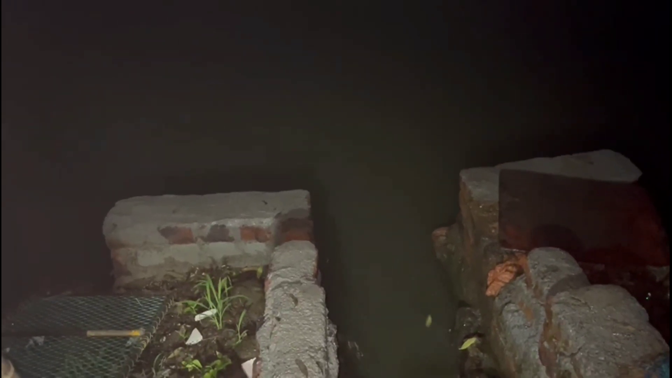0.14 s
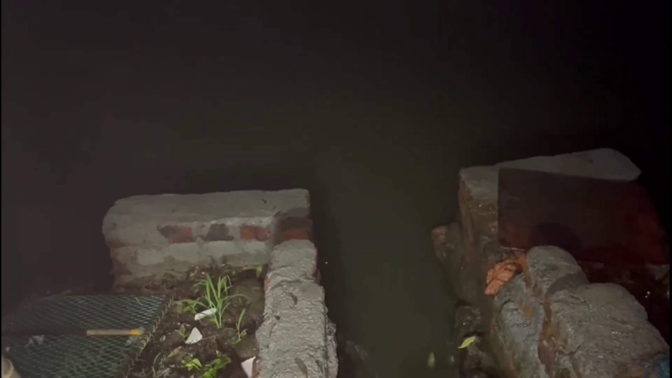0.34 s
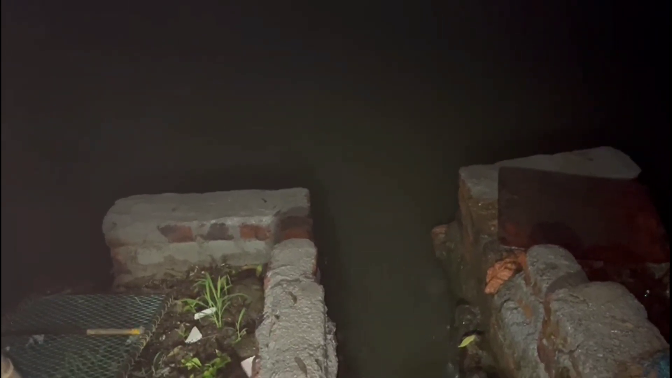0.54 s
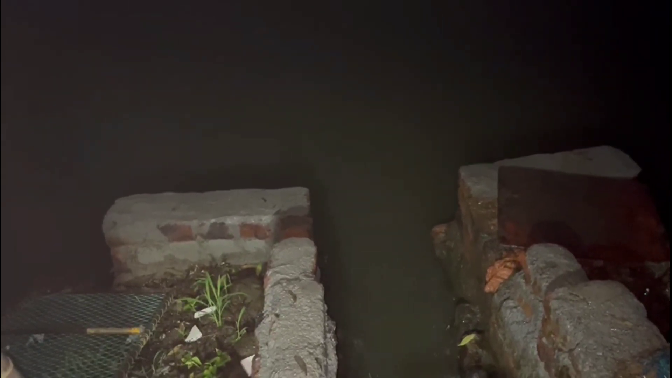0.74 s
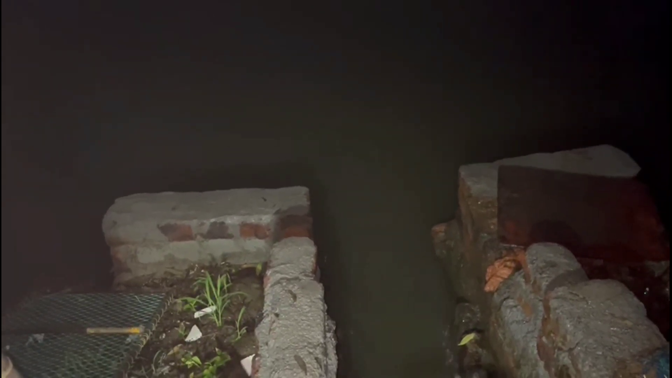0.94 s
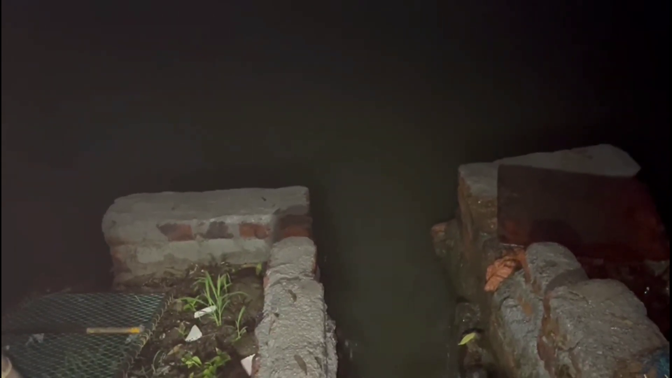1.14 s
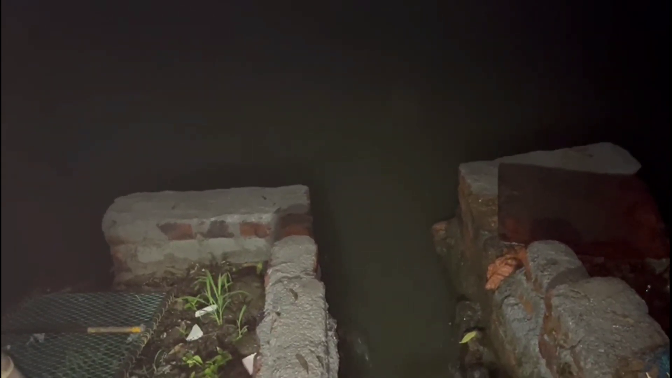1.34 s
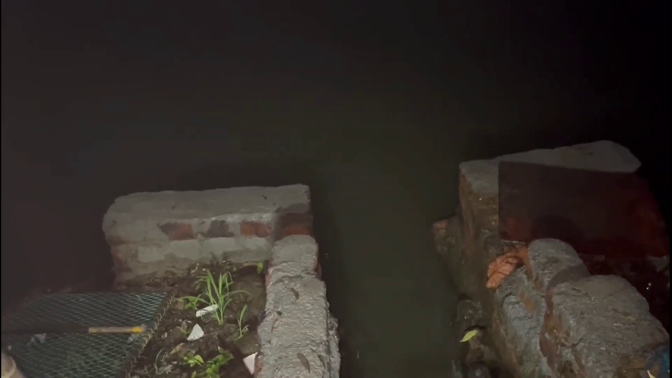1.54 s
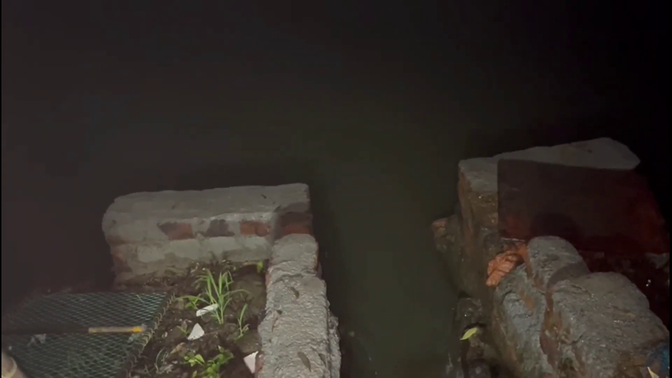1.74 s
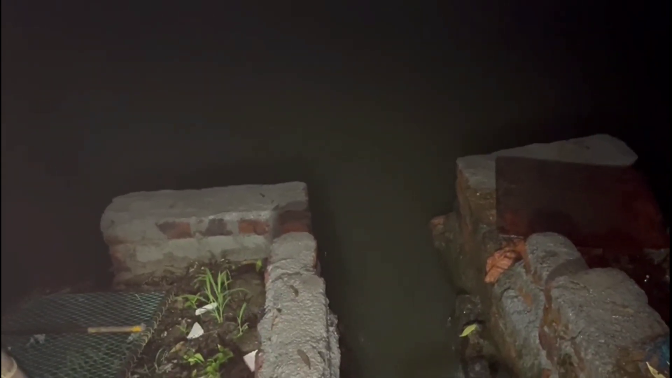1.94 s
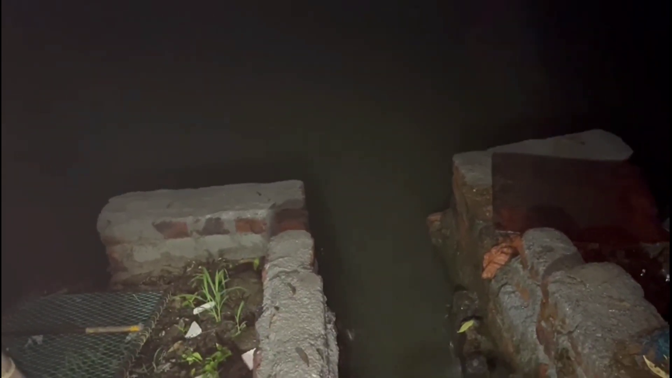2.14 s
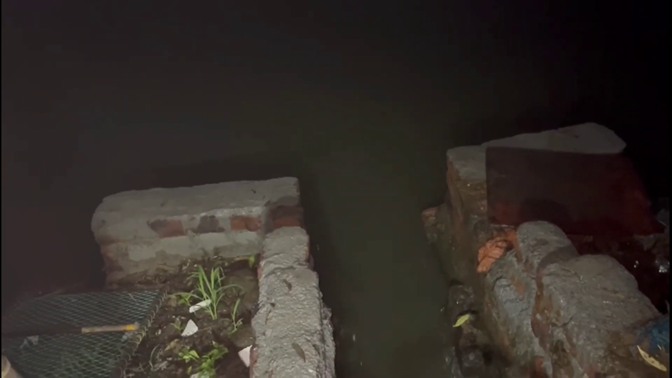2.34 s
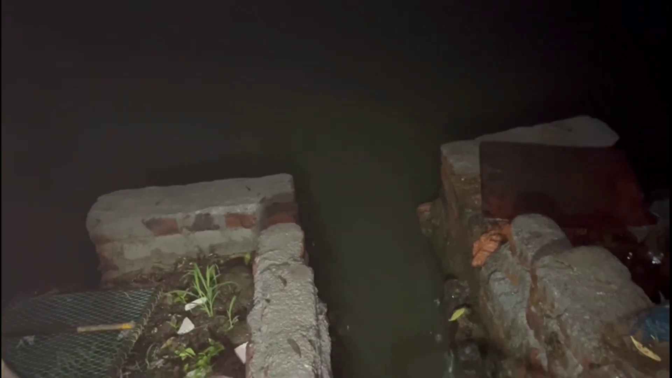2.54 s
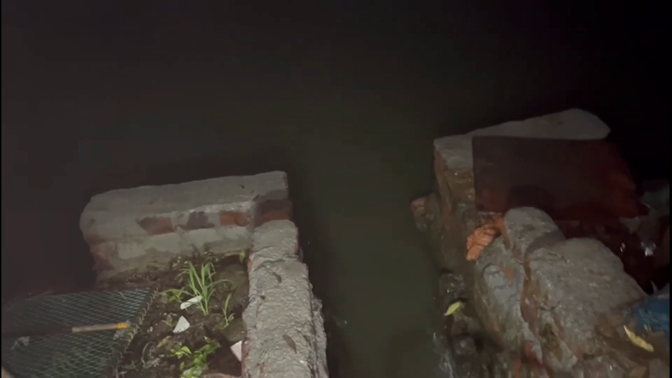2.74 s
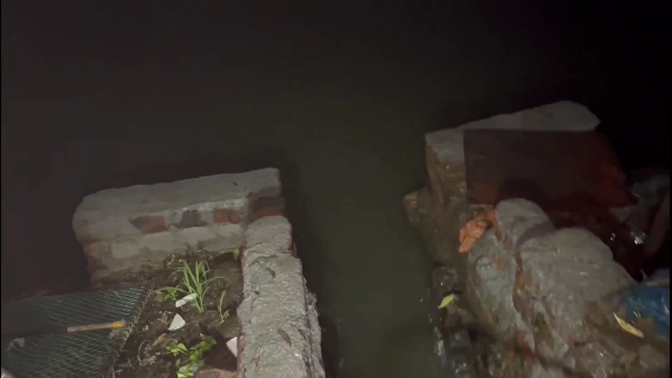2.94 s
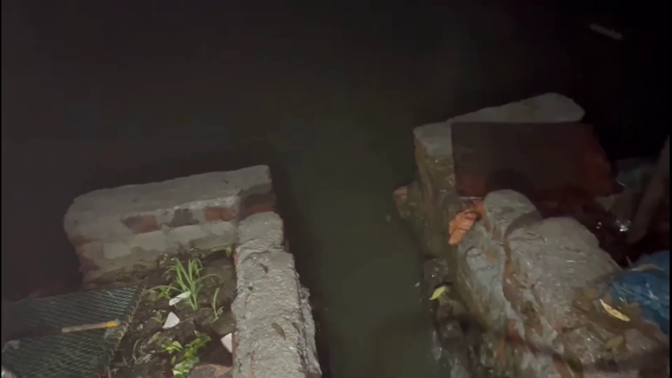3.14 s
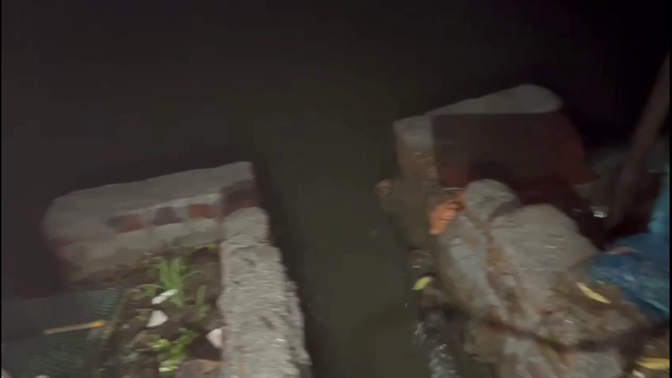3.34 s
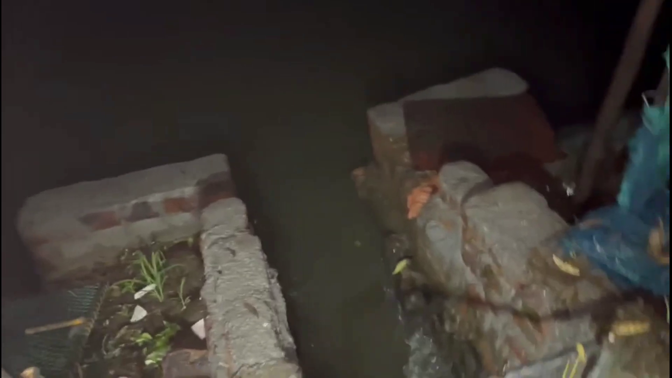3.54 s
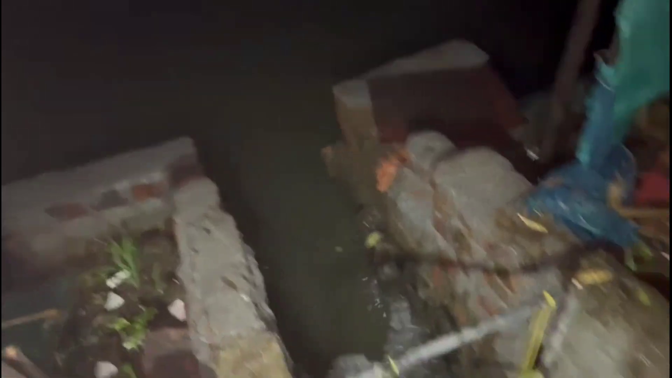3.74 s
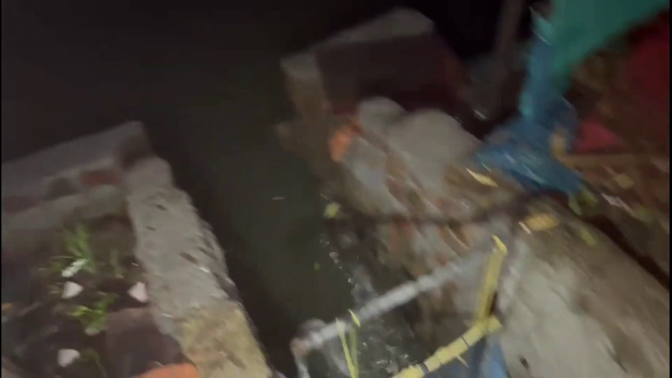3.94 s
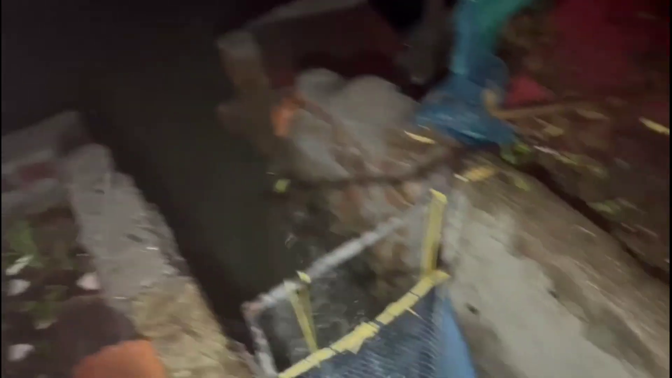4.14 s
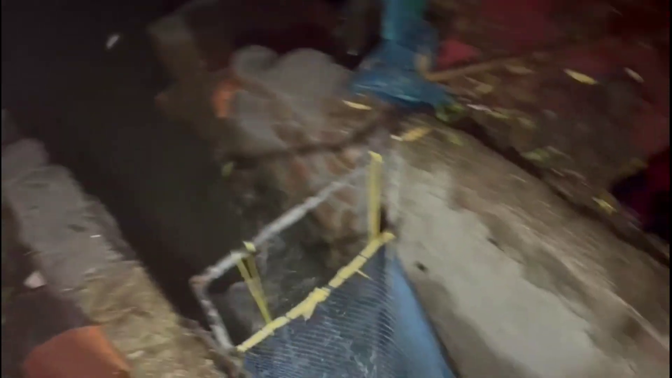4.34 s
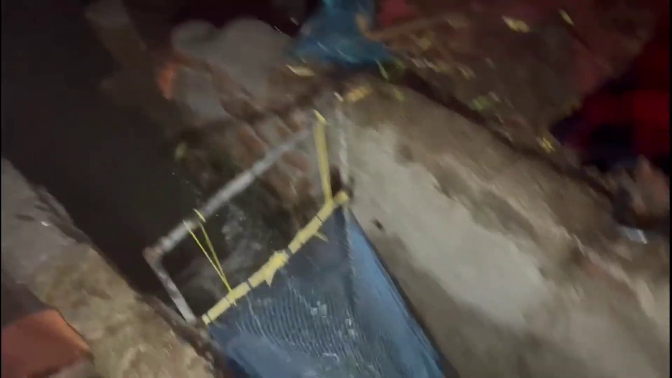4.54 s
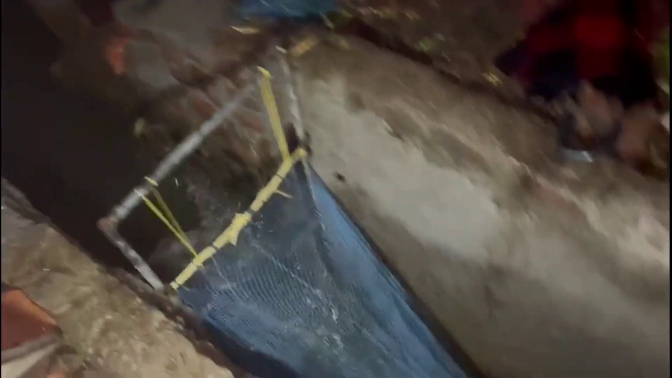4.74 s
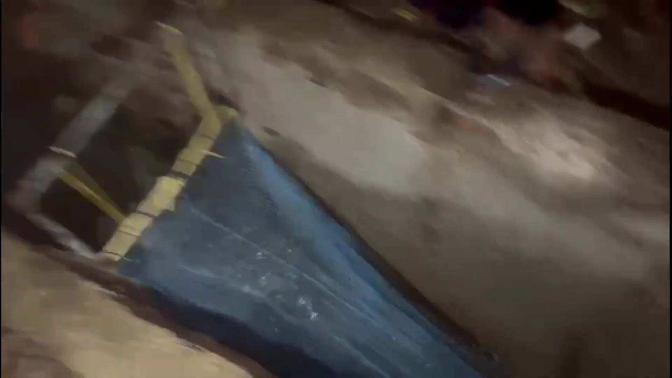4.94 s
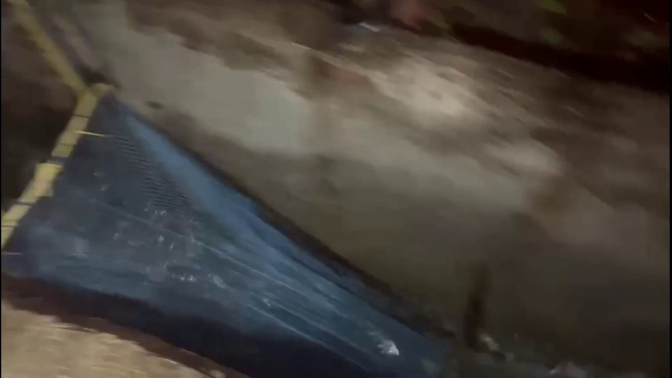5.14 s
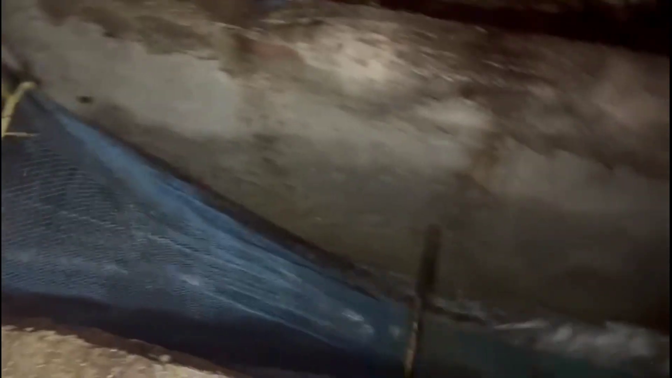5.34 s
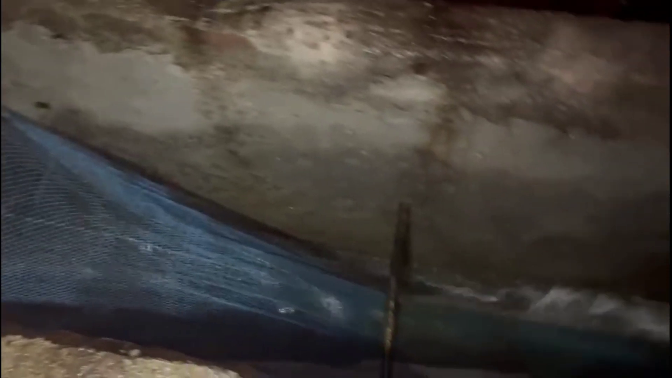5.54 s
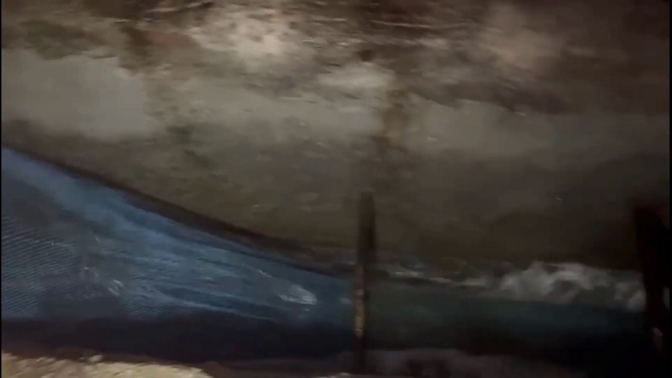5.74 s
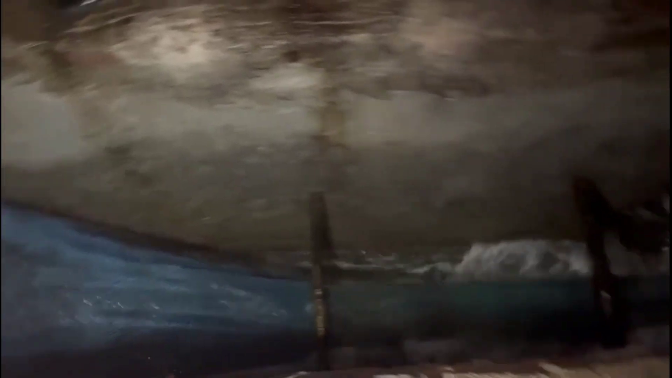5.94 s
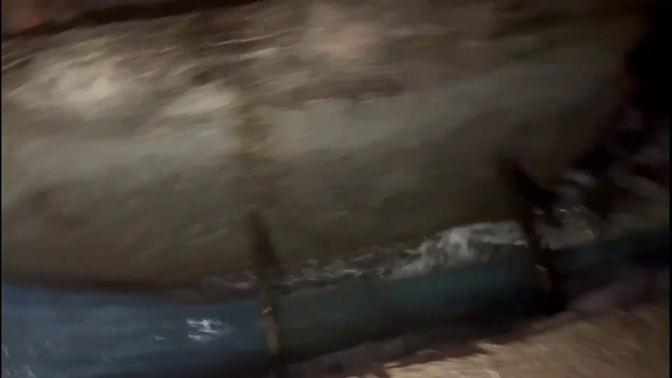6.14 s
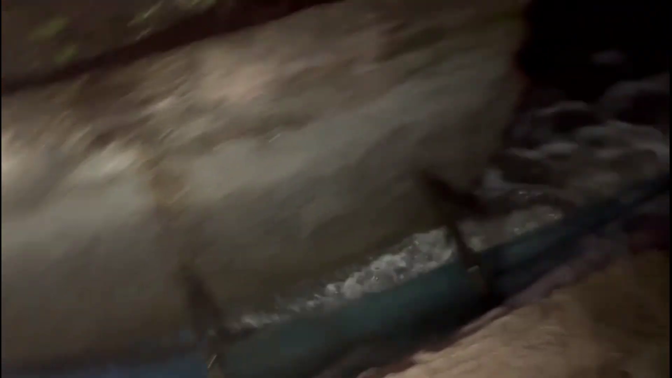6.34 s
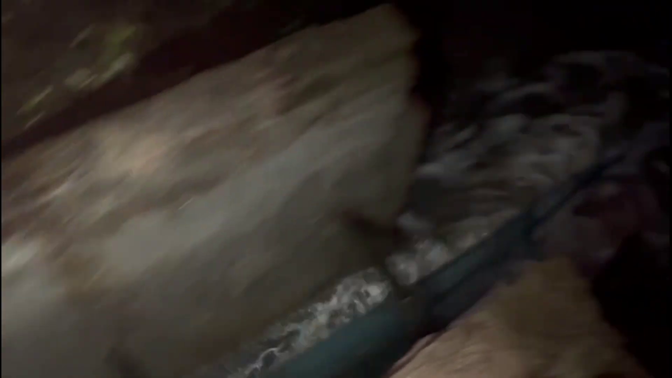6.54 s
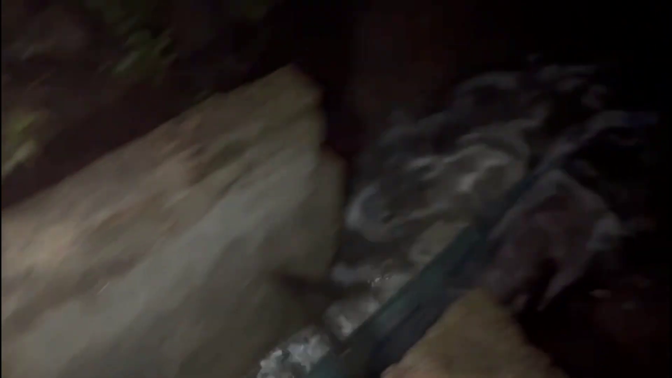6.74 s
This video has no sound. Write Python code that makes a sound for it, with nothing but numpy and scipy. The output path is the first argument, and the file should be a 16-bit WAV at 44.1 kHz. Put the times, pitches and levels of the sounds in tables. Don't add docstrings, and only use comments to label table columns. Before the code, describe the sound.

An unbroken rush of water through a narrow stone channel outdoors, heard from a handheld stereo microphone just above the stream. Bright, fine spray dominates over a soft gurgle and low rumble, with small plops and drips close by. After about four seconds the microphone turns past the wall toward the white water, and big bubbles, glugs and muffled thuds become fuller and closer.

```python
import sys
import numpy as np
from scipy import signal
from scipy.io import wavfile
from scipy.ndimage import uniform_filter1d

SR = 44100
rng = np.random.default_rng(int(sys.argv[2]) if len(sys.argv) > 2 else 0)


def store_wav(level_fs):
    pcm = np.round(np.clip(np.atleast_2d(level_fs), -1, 1) * 32767)
    wavfile.write(sys.argv[1], SR, pcm.T.astype(np.int16))


def linear_from_db(decibels):
    return 10 ** (np.asarray(decibels, float) / 20)


N = 303844
FRAME = 1024
RUMBLE_DB, GURGLE_DB, SPRAY_DB = -31, -31, -25
RUMBLE_FOLLOWS, SPRAY_FOLLOWS = 0.36, 1

# (time [s], heading [0 inlet, 1 side wall, 2 white water, 3 downstream])
HEADING = [
    (0, 0),
    (3.3, 0.03),
    (4.2, 0.6),
    (4.9, 1),
    (5.15, 1.8),
    (6.26, 2),
    (6.32, 3),
    (6.89, 3),
]
# (time [s], gurgle gain [dB], spray gain [dB])
NEARING = [
    (0, -1.5, -0.5),
    (1.5, 0, 0),
    (3.5, 0, 0),
    (4.0, 1.5, 1),
    (4.6, 2.5, 1),
    (5.1, 3.5, 1.1),
    (5.6, 4.5, 1.5),
    (6.15, 5.5, 1),
    (6.5, 3, 1),
    (6.89, 4, 0.7),
]

# (frequency [Hz], level per Hz [dB])
RUMBLE = [(13, -58), (22, -17), (59, 0), (80, 3.5), (100, -10), (119, -17.5), (183, 0), (227, -24),
          (260, -8), (340, -57), (570, -120)]
GURGLE = [(110, -42), (180, -5.5), (210, -11.5), (249, -7), (285, -3), (388, -3), (450, -4), (550, -3),
          (847, -12), (900, -21), (1170, -32), (1980, -120)]
SPRAY = [(550, -14.5), (750, -8), (950, -3), (1200, 0), (1400, -3), (1600, -3), (2000, -4.5), (3000, -5.5),
         (4600, -7.5), (5500, -13.5), (8000, -13.5), (11400, -17.5), (12000, -21), (12150, -59),
         (12400, -100)]
# (frequency [Hz], level [dB])
SHADE = [(300, -0.5), (385, 2.5), (460, 0), (850, 0), (1200, 0.5), (1400, 0), (1600, 1), (2700, 0),
         (3500, -1), (4300, -1), (5200, -1), (6500, -1.5), (10000, 1)]

# (frequency [Hz], likeness [0-1], right-left phase [rad], left-right level [dB])
INLET = [(60, 0.998, -0.02, 0.0), (200, 0.978, 0.01, 0.6), (350, 0.85, 0.12, 1.9), (550, 0.79, 0.4, -0.4),
         (800, 0.74, 0.08, -1.5), (1150, 0.86, 0.07, -0.8), (1400, 0.75, 0.18, -1.2),
         (1500, 0.52, 0.2, -1.7), (1600, 0.3, 1.8, -1), (1670, 0.25, 0.2, -0.4), (1750, 0.83, -0.3, 1.1),
         (2000, 0.82, -0.1, 0.7), (2450, 0.9, 0.0, 0.4), (2750, 0.82, -0.3, 0.6), (3200, 0.74, -0.45, 0.8),
         (3900, 0.74, -0.35, 1.2), (4700, 0.62, -0.52, 3.3), (5200, 0.68, -0.2, 1.5), (5700, 0.5, 0.5, 0.4)]
WALL = [(60, 0.997, -0.02, 0.2), (200, 0.971, 0.08, 0.8), (350, 0.891, 0.18, 2.2), (550, 0.77, 0.24, 0.7),
        (800, 0.56, 0.22, 0.6), (1150, 0.77, -0.13, 1.0), (1400, 0.45, 0.2, 0), (1520, 0.3, 1.6, -0.6),
        (1620, 0.42, 1.5, 0.4), (1730, 0.93, -0.06, 0.2), (2400, 0.92, -0.05, -0.0),
        (2750, 0.75, -0.5, 0.6), (3150, 0.66, -0.75, 1.2), (3900, 0.67, -0.25, 1.3),
        (4700, 0.58, -0.39, 2.9), (5500, 0.7, 0.3, 1.7)]
WHITE_WATER = [(60, 0.995, -0.02, 0.0), (200, 0.986, -0.01, 0.6), (350, 0.969, -0.05, 0.7),
               (580, 0.8, -0.3, 1), (800, 0.51, -0.59, 4.7), (1150, 0.43, -0.62, 2.6),
               (1400, 0.56, -2.84, 0.7), (1550, 0.64, 2.7, -1.3), (1650, 0.34, 2.36, 0.0),
               (1730, 0.97, 0.0, 0.0), (2200, 0.94, 0.0, 0.3), (2450, 0.68, -0.45, 0.6),
               (2750, 0.56, -1.1, 1.8), (3200, 0.54, -0.75, 1.5), (3900, 0.76, -0.15, 0.8),
               (4700, 0.77, -0.14, 1.0), (5500, 0.79, 0.15, 0.9)]
DOWNSTREAM = [(60, 0.993, -0.01, 0.2), (200, 0.958, -0.13, 0.8), (350, 0.941, -0.29, 0.9),
              (600, 0.85, -0.55, 1.5), (800, 0.69, -1.23, 5.1), (1150, 0.48, -1.41, 2.6),
              (1400, 0.7, -2.98, 0.4), (1490, 0.88, 3.1, -0.4), (1620, 0.55, 2.95, 0.3),
              (1730, 0.88, -0.15, 0.2), (1950, 0.96, 0, 0.2), (2150, 0.76, -0.4, 0.8),
              (2450, 0.65, -1.25, 1.5), (2700, 0.48, -1.95, 3), (3200, 0.27, -1.3, 4.4),
              (4000, 0.82, -0.05, 1.0), (4900, 0.45, -0.35, 0.0), (5600, 0.76, 0.1, 0.7)]
# (frequency [Hz], likeness [0-1],
# right-left phase [rad], left-right level [dB])
TREBLE = [(6100, 0.66, 0.4, 0.6), (6400, 0.62, 0.75, 1.3), (6800, 0.58, 1.42, 1.4), (7100, 0.62, 2.31, 0.9),
          (7450, 0.72, 2.79, 0.4), (7750, 0.99, 3.1416, 0), (9000, 0.98, 3.1416, 0),
          (9500, 0.83, -2.97, -0.1), (9800, 0.55, -2.05, 0.1), (10100, 0.54, -1.5, -0.0),
          (10400, 0.62, -0.58, 0.0), (10700, 0.8, -0.14, -0.0), (11200, 0.97, -0.02, -0.0)]

# (time [s], peak level [dB], frequency [Hz])
THUDS = [
    (1.25, -19, 66.4),
    (3.2, -18, 63),
    (4.27, -14, 81),
    (4.67, -15, 70),
    (5.26, -13, 72.4),
    (5.385, -14, 80),
    (5.98, -19.5, 76),
    (6.26, -14, 67.6),
    (6.35, -13, 75),
    (6.52, -15, 60),
]
# (time [s], peak level [dB], frequency [Hz])
GLUGS = [(2.675, -8.5, 409), (3.837, -11, 264), (4.111, -9, 417), (4.696, -9, 400), (5.104, -7, 413),
         (5.371, -6.5, 376), (5.487, -14, 362), (5.562, -8, 394), (5.6, -10, 360), (5.915, -9, 367),
         (6.105, -1, 500), (6.169, -10, 383), (6.509, -8, 357), (6.552, -13, 408), (4.781, -10, 337),
         (5.192, -8.5, 390), (5.326, -11, 525), (5.699, -7, 380), (5.769, -10, 296), (5.819, -14, 530),
         (5.969, -9, 570), (6.363, -14, 320), (6.471, -7.5, 400), (6.586, -5.5, 518), (6.835, -15, 380)]
# (time [s], peak level [dB], frequency [Hz])
PLOPS = [(0.165, -7, 1260), (0.515, -7, 1030), (0.612, -5, 1480), (0.865, -6, 2140), (1.067, -6, 1120),
         (1.668, -9, 1780), (1.85, -5, 1990), (2.14, -8, 1150), (3.65, -21, 1240), (4.456, -6.5, 1040),
         (4.973, -21, 1110), (5.094, -9, 1040), (5.245, -4, 1170), (6.781, -7, 1690)]
# (time [s], peak level [dB], frequency [Hz])
DROPS = [(0.8654, -12, 2260), (0.9755, -4, 2640), (1.0227, -7, 3800), (1.3668, -31, 2040),
         (1.8502, -8, 2120), (2.4369, -13, 2430), (2.4977, -23, 3930), (2.5551, -20, 2250),
         (3.219, -5, 2920), (3.236, -1, 3680), (3.5962, -24, 1880), (3.6521, -11, 2100), (3.7145, -8, 2460),
         (3.7534, -16, 1940), (4.6723, -4, 2380), (4.9721, -9, 1900), (5.0953, -4, 2370),
         (5.1831, -7, 2350), (5.25, -9, 1900), (5.2859, -2, 2900), (5.5508, -11, 1800), (5.933, -9, 1930),
         (6.0866, -7, 2120)]
# (time [s], peak level [dB], frequency [Hz])
SWELLS = [(0.096, -16, 445), (0.156, -19, 409), (0.173, -22, 620), (0.647, -15, 473), (0.736, -21, 600),
          (0.949, -18, 645), (1.268, -12, 544), (1.309, -19, 318), (1.398, -18, 660), (1.443, -13.5, 452),
          (1.872, -20, 279), (1.968, -18, 452), (2.002, -18, 387), (2.283, -14, 555), (2.406, -18, 333),
          (2.625, -15, 538), (2.821, -17, 645), (2.822, -14, 442), (2.95, -17, 390), (3.018, -21, 555),
          (3.103, -20, 473), (3.286, -16, 559), (3.365, -20, 344), (3.784, -14, 581), (4.244, -22, 366),
          (4.392, -22, 495), (4.427, -17, 600), (4.796, -12.5, 364), (5.146, -11, 444), (5.825, -12, 535),
          (6.189, -15, 655), (6.623, -12, 689)]
# (time [s], peak level [dB], frequency [Hz])
BURBLES = [(0.112, -10, 1421), (0.444, -14, 1030), (0.558, -17, 1520), (0.729, -11.5, 1119),
           (1.086, -13, 947), (1.121, -12, 1076), (1.159, -18, 1260), (1.162, -19, 940), (1.229, -17, 940),
           (1.45, -11, 1205), (2.096, -14, 990), (2.117, -19, 1291), (2.245, -14, 1679),
           (2.504, -9.5, 1440), (2.709, -14, 980), (2.741, -14, 1033), (2.748, -13, 1540),
           (2.761, -19, 818), (2.923, -13, 1210), (3.309, -15, 990), (3.722, -16, 904), (4.004, -15, 1507),
           (4.326, -10, 1230), (4.341, -15, 1679), (4.455, -16, 1580), (4.694, -9, 1130),
           (4.846, -17, 1540), (5.102, -7, 1076), (5.206, -11, 980), (5.465, -8, 1248), (5.518, -18, 904),
           (6.241, -18, 1507), (6.273, -14, 861), (6.34, -15, 1240), (6.726, -16, 1270), (6.87, -4.5, 1205)]
# (time [s], peak level [dB], frequency [Hz])
FLECKS = [(0.253, -9, 3359), (0.303, -12, 3703), (0.794, -13, 4995), (1.022, -17, 4823), (1.308, -12, 4134),
          (1.328, -15, 2842), (1.361, -13, 4134), (1.368, -12, 4823), (1.73, -14, 3531), (1.809, -15, 4478),
          (2.067, -10, 3100), (2.317, -13, 4909), (2.41, -11, 2670), (2.438, -14, 2325), (2.555, -9, 4330),
          (2.673, -12, 2411), (2.688, -13, 4220), (2.99, -13, 1808), (3.35, -8, 3359), (3.425, -8, 3359),
          (3.596, -12, 1894), (3.692, -11, 1894), (3.717, -15, 2583), (4.013, -9, 4737), (4.047, -11, 4048),
          (4.132, -10, 1894), (5.081, -14, 4134), (5.101, -14, 4048), (6.048, -13, 3617), (6.686, -8, 4430)]


def unit(x):
    return x / np.sqrt(np.mean(np.abs(x) ** 2) + 1e-20)


def along(points, hz):
    f, *cols = np.transpose(points)
    return [np.interp(np.log(hz + 1), np.log(f.real + 1), c) for c in cols]


def curves(rows, s):
    t, *cols = np.transpose(rows)
    return [np.interp(s, t, c) for c in cols]


def frames(x):
    return signal.stft(x, SR, nperseg=FRAME, noverlap=FRAME * 3 // 4)


def unframe(z):
    return signal.istft(z, SR, nperseg=FRAME, noverlap=FRAME * 3 // 4)[1][:, :N]


def patches(shape, bins, steps):
    field = rng.standard_normal(shape)
    field = uniform_filter1d(field, round(bins), -2)
    return unit(uniform_filter1d(field, round(steps), -1))


def bubbles(s, hz, size, cycles, rise):
    length = int(2.3 * cycles * SR / hz.min())
    turn = np.arange(length) / SR * hz[:, None]
    tone = np.sin(2 * np.pi * turn * (1 + rise * turn / cycles / 2))
    decay = np.exp(-3 * turn / cycles)
    onset = 1 - np.exp(-0.9 * turn)
    ring = size[:, None] * tone * decay * onset
    at = (s * SR).astype(int)[:, None] + np.arange(length)
    return np.bincount(at.ravel(), ring.ravel(), N + SR)[:N]


def crowd(spectrum, lo_hz, hi_hz, count, cycles, spread_db, share, patchy_db):
    streams = []
    for stream in range(3):
        when, pitch, luck = rng.random((count, 3)).T
        hz = lo_hz * (hi_hz / lo_hz) ** pitch
        size = linear_from_db(-spread_db * np.log(1.01 - luck))
        streams.append(bubbles(when * N / SR, hz, size, cycles, rise=0.29))
    hz, s, grains = frames(np.array(streams))
    power = np.mean(np.abs(grains) ** 2, (0, 2))
    grains = grains / np.sqrt(uniform_filter1d(power, size=5) + 1e-20)[:, None]
    noise = unit(frames(rng.standard_normal((3, N)))[2])
    mix = np.sqrt(share) * grains + np.sqrt(1 - share) * noise
    colour_db = along(spectrum, hz)[0][:, None]
    mix = mix * linear_from_db(colour_db + patchy_db * patches(mix.shape[1:], bins=18, steps=6))
    return mix / np.sqrt(np.mean(np.sum(np.abs(mix) ** 2, 1)) * 4 / 3)


def rush():
    hop = FRAME // 4
    s = np.arange(-(-N // hop) + 1) * hop / SR
    near_db, open_db = curves(NEARING, s)
    surge = patches((1, len(s)), bins=1, steps=8)

    rumble = crowd(RUMBLE, 153, 233, count=300, cycles=3.4, spread_db=4.5, share=0.04, patchy_db=1.04)
    rumble = rumble * linear_from_db(RUMBLE_DB + RUMBLE_FOLLOWS * near_db)
    gurgle = crowd(GURGLE, 221.8, 899, count=1300, cycles=7.64, spread_db=2.5, share=0.15, patchy_db=0.24)
    gurgle = gurgle * linear_from_db(GURGLE_DB + near_db + 0.17 * surge)
    spray = crowd(SPRAY, 798, 11500, count=20000, cycles=6.66, spread_db=0.35, share=0.25, patchy_db=1.06)
    spray = spray * linear_from_db(SPRAY_DB + SPRAY_FOLLOWS * open_db + 0.5 * surge)

    facing = np.clip(curves(HEADING, s)[0] - 1, 0, 1)
    shade_db, = along(SHADE, np.fft.rfftfreq(FRAME, 1 / SR))
    return rumble + (gurgle + spray) * linear_from_db(shade_db[:, None] * facing)


def single_bubbles():
    # (events, ring [cycles], gain [dB])
    kinds = ((THUDS, 4.5, 1.5), (GLUGS, 11, -6), (PLOPS, 7, -2.5), (DROPS, 9, -4.5),
             (SWELLS, 9, -1), (BURBLES, 9, -1), (FLECKS, 10.5, -1.5))
    total = np.zeros(N)
    for rows, cycles, gain_db in kinds:
        s, db, hz = np.transpose(rows)
        total += bubbles(s, hz, linear_from_db(db + gain_db), cycles, rise=0.064)
    return total


def ports(hz, s):
    heading, = curves(HEADING, s)
    likeness, balance_db = 0, 0
    for k, view in enumerate((INLET, WALL, WHITE_WATER, DOWNSTREAM)):
        f, alike, phase, db = np.transpose(view + TREBLE)
        alike, db = along(np.transpose([f, alike * np.exp(1j * phase), db]), hz)
        weight = np.clip(1 - np.abs(heading - k), 0, 1)
        likeness = likeness + alike[:, None] * weight
        balance_db = balance_db + db.real[:, None] * weight
    return likeness, balance_db


def scene():
    direct, left, right = rush()
    hz, s, single = frames(single_bubbles())
    likeness, balance_db = ports(hz, s)
    shared = np.sqrt(np.abs(likeness)) * direct + single
    scattered = np.sqrt(np.clip(1 - np.abs(likeness), 0, 1))
    delayed = shared * np.exp(1j * np.angle(likeness))
    left = (shared + scattered * left) * linear_from_db(balance_db / 2)
    right = (delayed + scattered * right) * linear_from_db(-balance_db / 2)
    return unframe(np.array([left, right]))


def low_pass(x):
    return signal.sosfilt(signal.butter(12, 12920, fs=SR, output="sos"), x)


def record(dry):
    bass_cut = signal.butter(3, 38, "high", fs=SR, output="sos")
    mix = signal.sosfilt(bass_cut, dry)
    return low_pass(mix)


dry = scene()
out = record(dry)
store_wav(out)
```